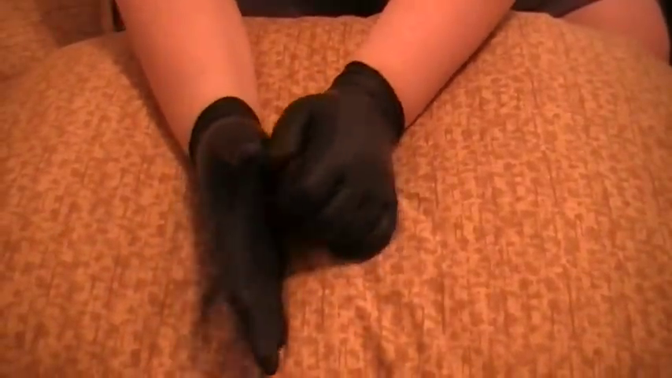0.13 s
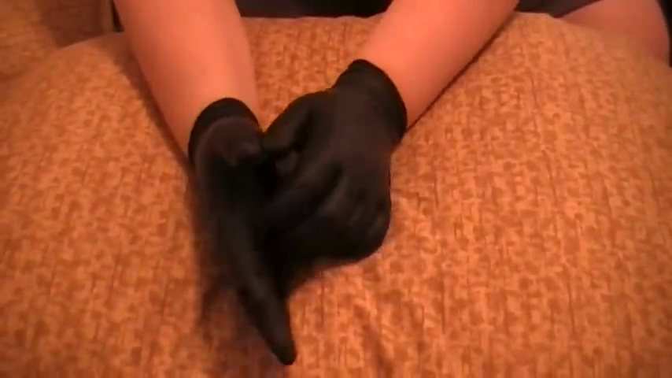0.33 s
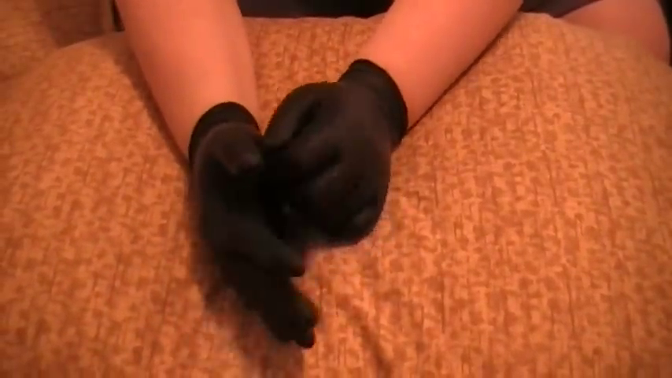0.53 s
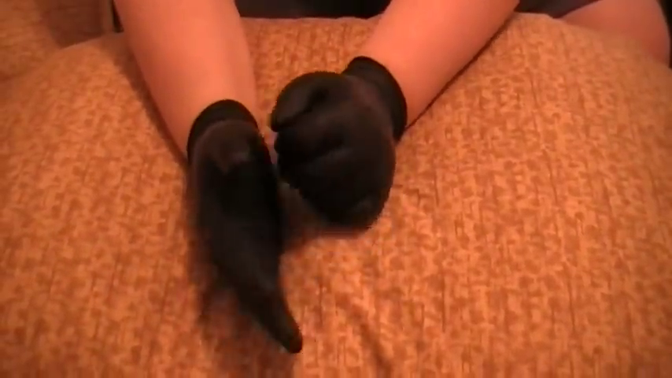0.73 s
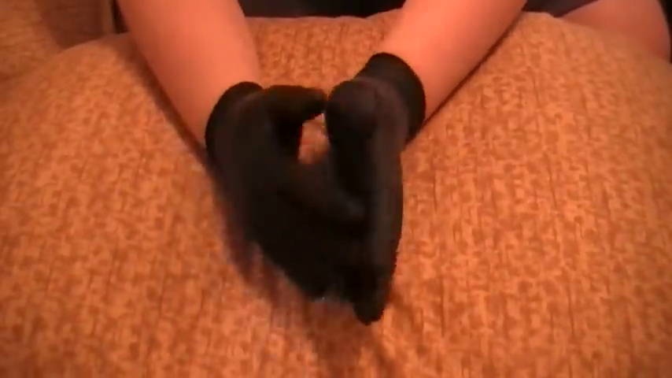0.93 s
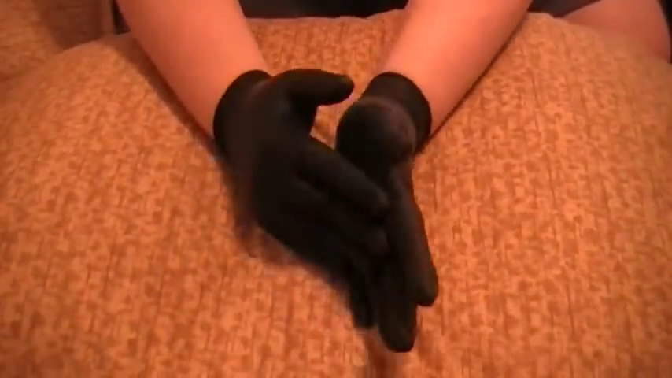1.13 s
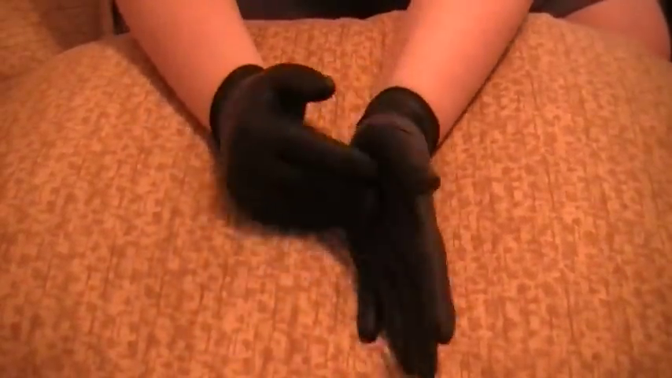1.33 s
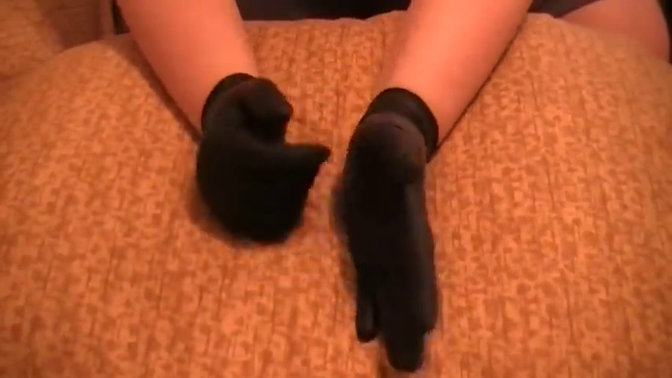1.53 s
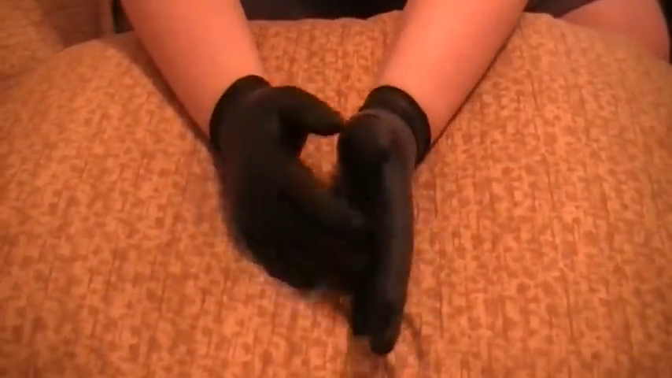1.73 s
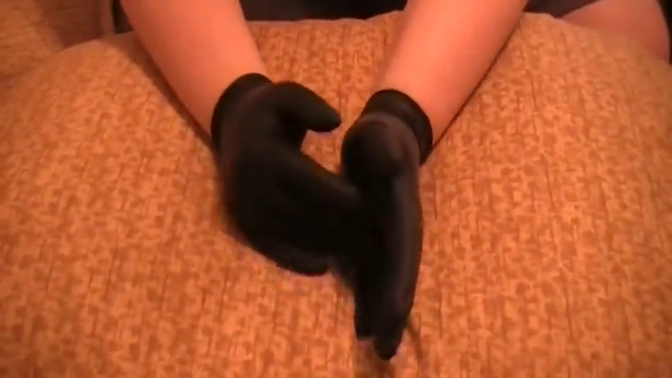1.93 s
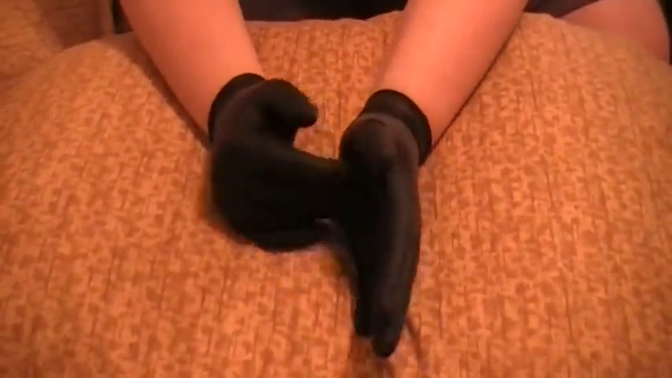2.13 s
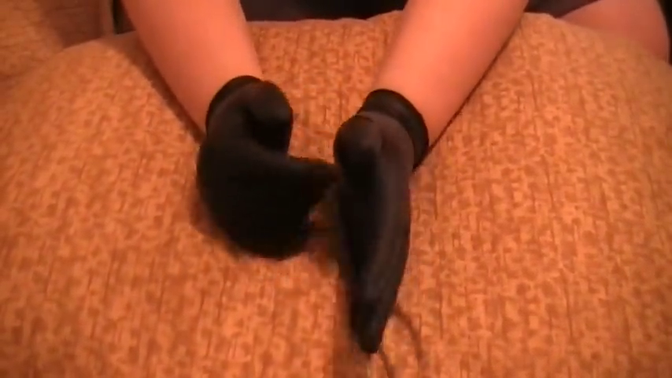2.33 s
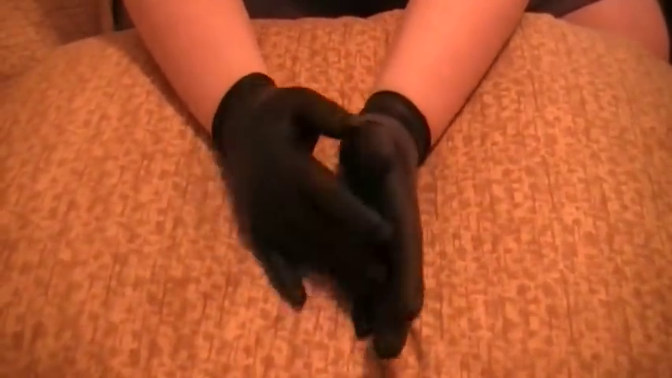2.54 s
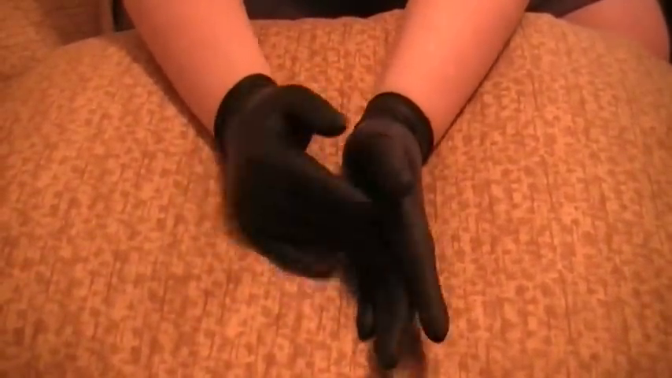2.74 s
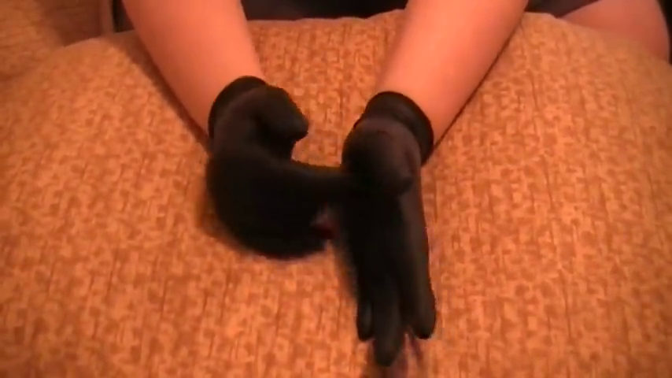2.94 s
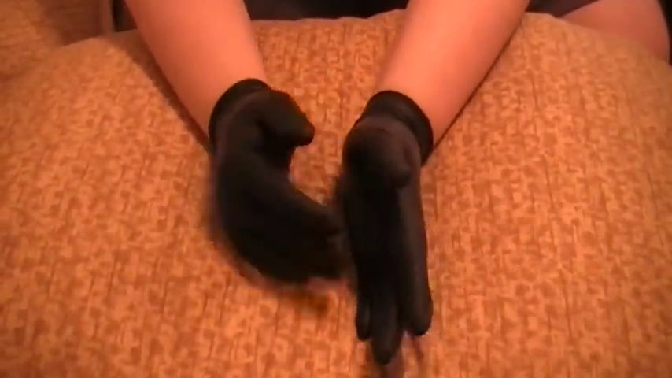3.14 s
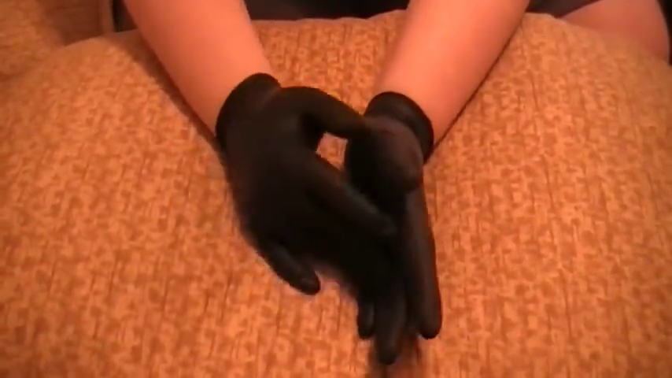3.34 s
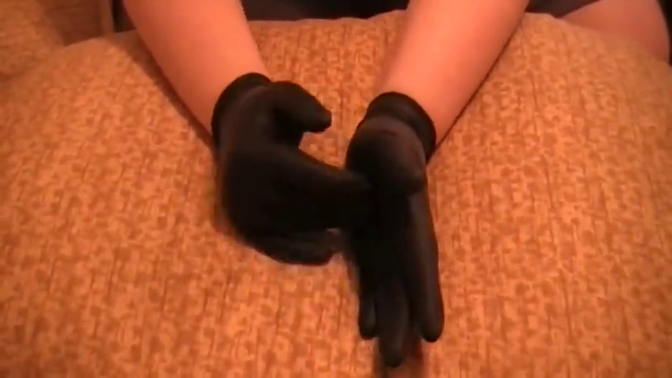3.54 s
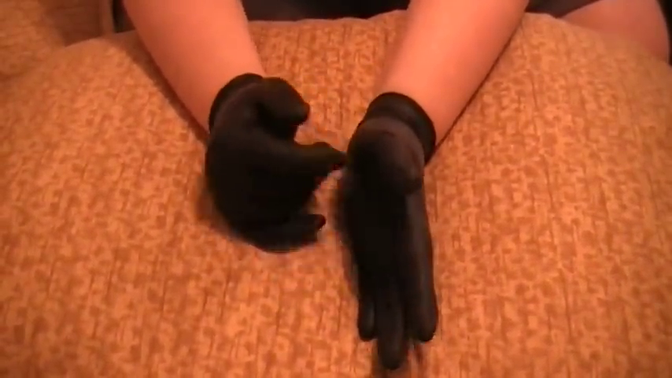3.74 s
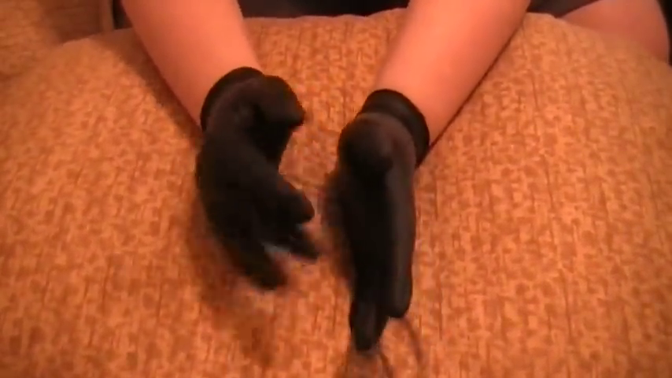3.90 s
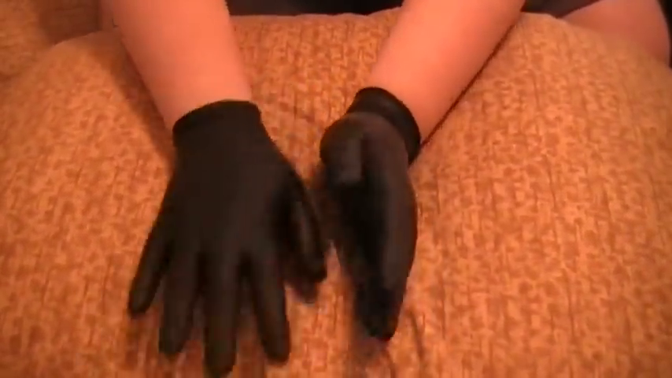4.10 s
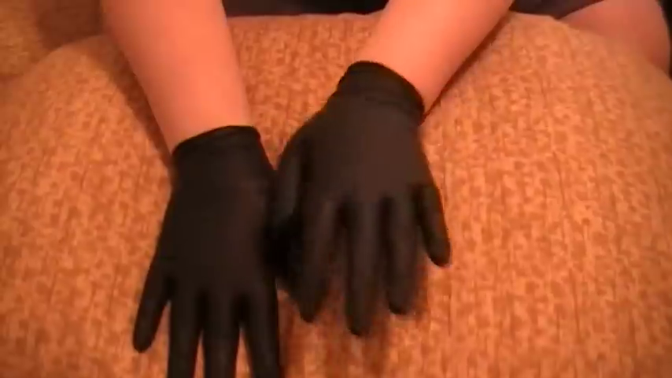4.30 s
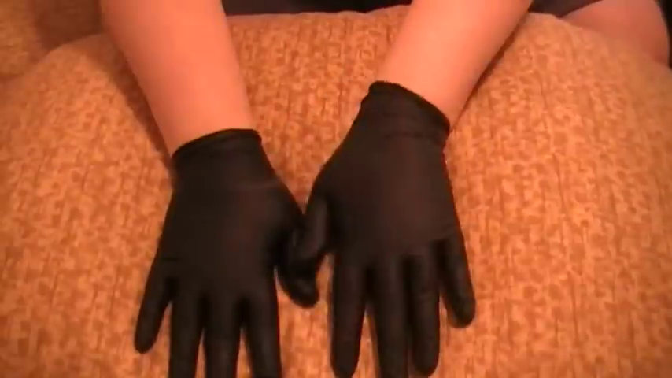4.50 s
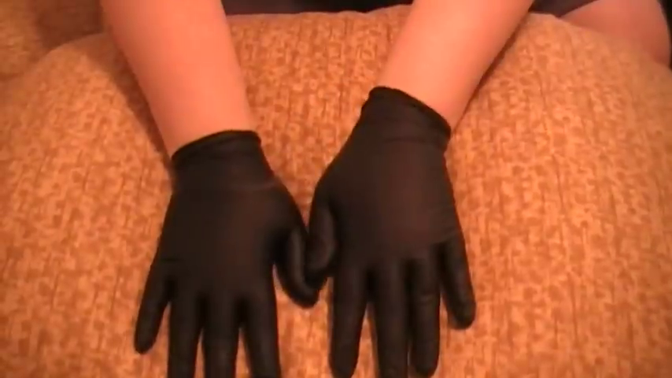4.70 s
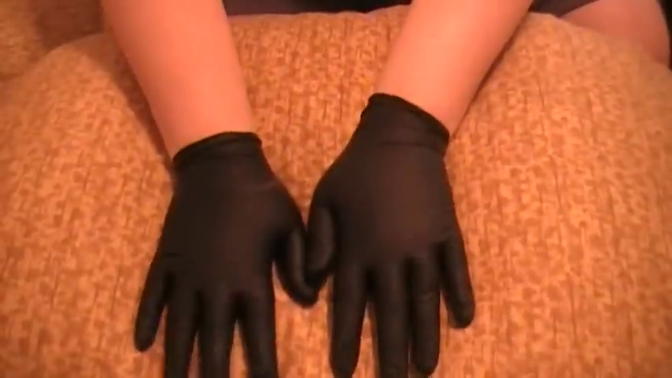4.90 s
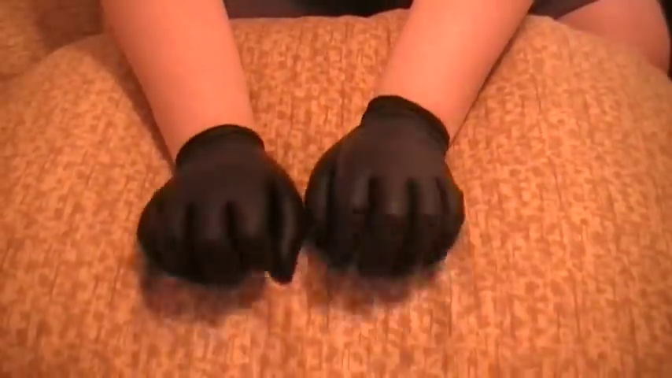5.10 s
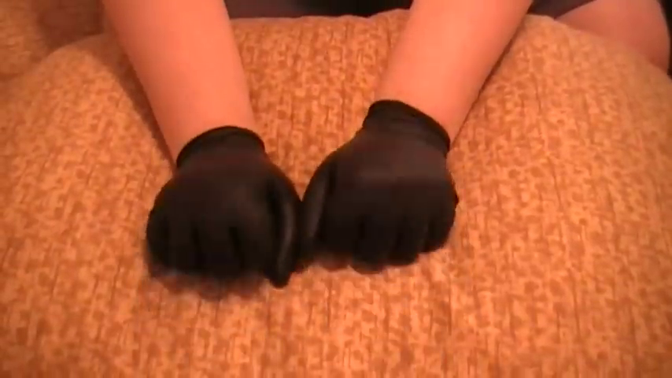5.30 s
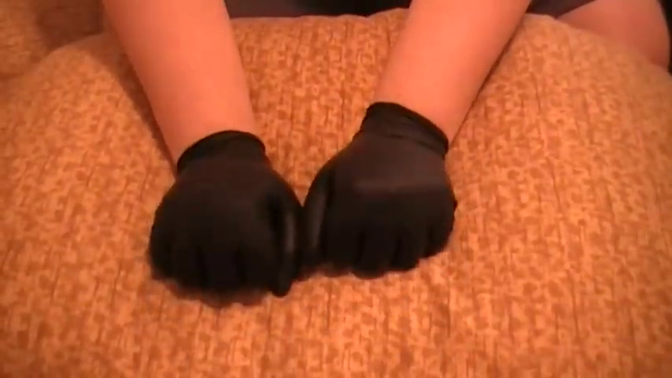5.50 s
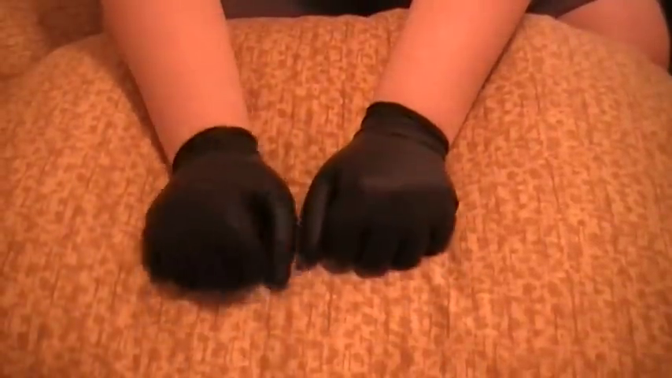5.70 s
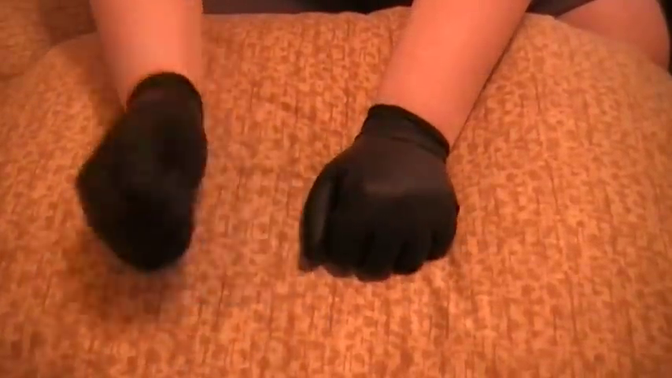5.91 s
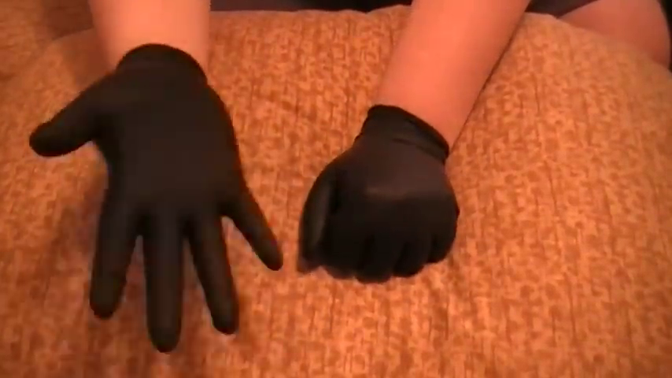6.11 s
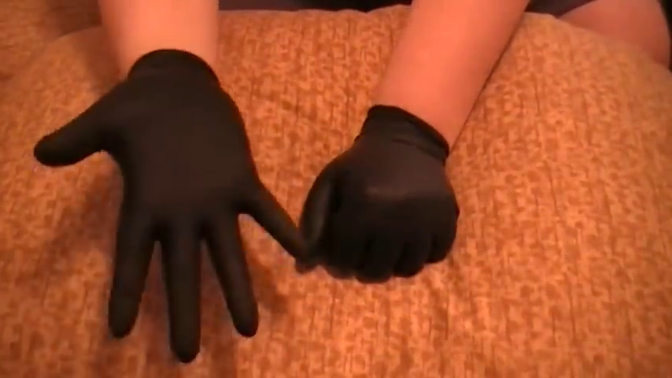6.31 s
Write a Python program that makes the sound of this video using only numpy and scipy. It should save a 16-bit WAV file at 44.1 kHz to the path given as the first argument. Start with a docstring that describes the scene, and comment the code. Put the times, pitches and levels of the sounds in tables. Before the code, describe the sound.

Gloved hands at a close stereo microphone: the film tightens with a brief rising hiss and creak, then snaps brightly against skin with a short room echo. Snaps come singly and in rapid flurries, between scrapes and rubs. Later only smooth cloth rubbing, quiet ticks and soft hand landings remain, over faint air noise and thin hum.

```python
"""Two hands in latex gloves work over a cloth cushion in a small room, heard from very close.
Still air, a wavering fan hum and a faint picture tube whistle (noise and sines) lie under everything.
For nearly four seconds stretched rubber hisses, creaks and snaps (click bursts through filters), hot enough
to clip; between the snaps come cloth rubs, crease clicks, scrapes (gliding resonances) and a soft pat.
Then longer rubs over the cloth lead (sparse grains), with juddering palms, a few ticks and more pats."""
import sys
import numpy as np
from scipy import signal
from scipy.fft import rfft, irfft
from scipy.io import wavfile
from scipy.ndimage import uniform_filter1d, minimum_filter1d

SR = 44100
rng = np.random.default_rng(int(sys.argv[2]) if len(sys.argv) > 2 else 0)


def store_wav(level_fs):
    """Save 16-bit WAV to argv[1]."""
    pcm = np.round(np.clip(np.atleast_2d(level_fs), -1, 1) * 32767)
    wavfile.write(sys.argv[1], SR, pcm.T.astype(np.int16))


N = 280022

# Still air: spectrum (frequency [Hz], level per Hz [dB]), then its overall rms level [dB]
AIR = [(20, -22), (45, -12), (68, -3), (105, -11), (160, -3), (270, -4), (420, -0.5), (800, -2),
       (1200, -3.5), (2100, -10), (4500, -19.5), (7500, -20), (10000, -29), (15000, -40)]
AIR_DB = -58.5
# Left-right likeness of the air: (frequency [Hz], likeness [0-1])
AIR_SAME = [(50, .5), (150, .1), (600, .05), (2000, 0.14), (7000, .3), (15000, .3)]
# Fan hum and picture tube whistle: (frequency [Hz], peak level [dB])
TONES = [(358, -71.5), (581, -75), (1085, -75), (15735, -69)]

# Snaps of the glove film: (time [s], slap on the skin [dB], air pocket [dB], crack of the film [dB],
# length of the peel [ms], slap pitch [Hz], pocket pitch [Hz], crack pitch [Hz],
# ring of the film re crack, before a common trim [dB], room echo [dB])
SNAPS = [(-0.025, -22, -22, -17.5, 1.13, 1210, 3000, 6940, -21, -8.5),
         (0.4257, -28, -27, -16, 0.67, 1260, 2490, 7730, -33.5, -8.5),
         (0.5272, -19.5, -15.5, -6, 1.1, 1310, 2620, 7030, -15, -8.7),
         (0.5961, -27, -23, -13.5, 1.2, 1940, 2970, 7400, -13, -8.5),
         (0.5986, -31, -23.5, -17.5, 0.85, 1590, 2020, 7400, -33, -9),
         (0.6507, -35.5, -36, -20, 0.52, 1450, 2700, 8300, -28, -8),
         (1.2943, -23, -27, -21.5, 0.65, 1220, 2480, 7850, -33, -9),
         (1.4397, -25, -18.5, -15.5, 1, 1280, 2730, 7800, -16.5, -8.5),
         (1.4554, -29, -24, -16, 0.72, 1380, 2700, 7280, -20, -9),
         (2.0177, -23, -25, -13.5, 0.83, 1490, 2590, 7500, -32.5, -9.5),
         (2.172, -27, -20.5, -23.5, 2.2, 1190, 2940, 7200, -15, -8),
         (2.1853, -20.5, -14.5, -7.5, 1.33, 1070, 3040, 7410, -11.5, -9.5),
         (2.2025, -34, -28, -22.5, 1.4, 1460, 3100, 7150, -17, -11),
         (2.215, -42, -31, -31, 0.73, 1190, 3100, 6450, -23, -11),
         (2.7664, -39, -33.5, -31, 1, 1580, 2600, 7140, -33, -11),
         (2.786, -35.5, -40, -28, 1.7, 1390, 2650, 7190, -33, -9),
         (2.8023, -25, -18, -13.5, 2, 1650, 2670, 7320, -31, -10),
         (2.8126, -30.5, -26.5, -23, 1, 1540, 2650, 7540, -28, -10.5),
         (2.9353, -28, -19.5, -21.5, 1, 1530, 3040, 7200, -12, -8),
         (2.9497, -29, -21.5, -11, 0.65, 1270, 3080, 7500, -13, -9.5),
         (2.9519, -34, -25, -19, 0.74, 1210, 3060, 7370, -23, -11),
         (2.9713, -40, -35, -29.5, 0.8, 1200, 3100, 7800, -28, -8),
         (3.501, -27.5, -23, -10.5, 0.7, 1138, 2673, 7600, -33, -10),
         (3.5053, -34.5, -42, -22, 0.74, 870, 2700, 7360, -33, -9),
         (3.6363, -39, -34, -32, 1, 1430, 2700, 5590, -33, -9.5),
         (3.6425, -16, -17, -5.5, 1.4, 1450, 2820, 7090, -21.5, -11),
         (3.6661, -32.5, -25, -17, 0.85, 1320, 2920, 7200, -25.5, -11),
         (3.6885, -33.5, -26, -12, 0.87, 1260, 2900, 7610, -28, -11.5)]
# Spectra of slap, crack and rubber hiss: (frequency [Hz], level [dB])
SLAP = [(30, -50), (120, -26), (300, -12), (520, -8), (760, -0.5), (1000, -3.5), (1350, 0), (1850, -2.5),
        (2400, -11), (4500, -30), (16000, -70)]
CRACK = [(100, -60), (1800, -24), (3000, -17), (4000, -13.5), (5100, -9), (6000, -10.5), (7300, 0),
         (8200, -4), (9200, -14.5), (11000, -22.5), (16000, -32)]
HISS = [(100, -45), (1500, -22), (3000, -12.5), (4500, -9), (5700, -3.5), (7200, 1), (8200, -3),
        (9500, -13), (12000, -21), (16000, -38)]
# Ring of the freed film: (frequency [Hz], width of each resonance pass [Hz], level [dB], t60 [s])
FILM_MODES = [(3170, 170, 0, .45), (3430, 350, -10, .36), (4800, 350, -8, .3)]
# Pitches at which the low and the high spectra are written, before each event shifts them [Hz]
LOW_HZ, HIGH_HZ = 1300, 7300

# Fingers pull the film tighter until it lets go: (time of letting go [s], time to build by 10 dB [s],
# rub before trim [dB], hiss of the rubber before trim [dB], creak of the air pocket [dB])
PULLS = [(0.424, .018, -53, -41, -66), (1.292, .048, -44, -40, -49), (1.438, .022, -58, -41, -64),
         (2.012, .07, -44.5, -42.5, -44), (2.17, .018, -47, -42, -42), (2.795, .07, -43, -38, -43),
         (3.497, .085, -47.5, -42, -51), (3.636, .026, -51, -48, -66)]
LET_GO_S = .024  # the tension falls 10 dB in this time
CREAK_HZ = 2630  # air pocket under the stretched film
CREAK_POWER = 1.35  # the creak grows faster than the tension
# Hand slides: (time of full speed [s], rise by 10 dB [s], fall by 10 dB [s],
# rub on the cloth before trim [dB], hiss of the rubber before trim [dB])
RUBS = [(0.02, .05, .18, -58, -57), (0.13, .06, .04, -62, -59), (0.21, .035, .07, -52, -50.5),
        (0.37, .04, .12, -63, -55.5), (0.79, .1, .14, -76, -59.5), (0.96, .075, .11, -55.5, -54.5),
        (1.15, .065, .1, -54, -52.5), (1.66, .14, .16, -57.5, -57.5), (1.865, .055, .07, -60, -52.5),
        (2.42, .13, .11, -59, -58), (2.6, .1, .12, -57.5, -55), (3.2, .13, .12, -58.5, -60),
        (3.35, .05, .07, -63, -56), (3.98, .14, .17, -57.5, -56.5), (4.2, .13, .105, -48.5, -48),
        (4.44, .14, .17, -54, -56), (4.72, .15, .18, -60, -62.5), (5.02, .135, .13, -51, -50.5),
        (5.24, .13, .135, -51.5, -52), (5.79, .24, .25, -54.5, -54.5), (6.02, .05, .13, -58.5, -55.5),
        (6.25, .18, .2, -63, -76)]
RUB_ROUNDNESS = 1.4  # 1 swells to a sharp peak, 2 like a bell
# Spectrum of the cloth rub: (frequency [Hz], level [dB])
CLOTH = [(30, -42), (100, -22), (200, -6), (450, 0), (900, -1.5), (1600, -2), (2800, -6), (4200, -13.5),
         (8000, -30), (16000, -55)]

# Small creases that flip: (time [s], body [dB], crack [dB], body pitch [Hz], crack pitch [Hz])
TICKS = [(0.1467, -59, -56, 2100, 6370), (0.3423, -56.5, -45, 3160, 6100), (0.9113, -49, -48.5, 1160, 7800),
         (1.1597, -45, -35, 2430, 7700), (1.205, -68, -39.5, 1540, 7160), (1.238, -56, -39.5, 1780, 7700),
         (1.3555, -42.5, -45.5, 1670, 7180), (1.654, -49, -45, 4390, 6300), (1.767, -66, -50.5, 1640, 7300),
         (1.8297, -59, -46, 1300, 7330), (1.9373, -45.5, -36.5, 2660, 6850),
         (1.9595, -46, -39.5, 2640, 6900), (1.9919, -43, -30.5, 2410, 7500), (2.61, -53, -40.5, 3710, 7350),
         (2.614, -54, -42.5, 2420, 7300), (2.6478, -54, -37.5, 2730, 7600),
         (2.6766, -49.5, -31, 3710, 7590), (3.16, -47.5, -48.5, 2430, 6990),
         (3.3637, -49, -34.5, 3430, 7600), (3.369, -54, -39, 3420, 7400), (3.4064, -54, -44, 3670, 6830),
         (3.8823, -59, -53, 2010, 5930), (4.2817, -59.5, -42, 1390, 7260), (4.2903, -65, -49, 1480, 7110),
         (4.6876, -50, -57.5, 2490, 7980), (5.7744, -47, -49, 1600, 7510), (5.8484, -52, -50, 1940, 6950),
         (5.9548, -48, -58, 3070, 5540), (6.1068, -69, -54.5, 1500, 6430), (6.272, -68, -59, 1900, 7000)]
# Spectra of a crease's crack and body: (frequency [Hz], level [dB])
CREASE = [(100, -50), (2000, -30), (4000, -17), (5800, -8), (7300, 2.5), (8700, -5), (11000, -14),
          (16000, -25)]
CREASE_BODY = [(50, -34.5), (250, -17), (750, -11), (1300, 0.5), (1900, -10), (3000, -22), (9000, -45)]
# A dull crease flips more slowly than a crisp one: (body minus crack [dB], length of the flip [ms])
FLIP = [(-5, .34), (8, 2.2)]

# Short scrapes of rubber that sticks and slips:
# (start [s], length [s], level [dB], resonance at the start [Hz], resonance at the end [Hz])
SCRAPES = [(.176, .064, -42.5, 6300, 5500), (.228, .054, -46, 6800, 6600), (.279, .011, -38.5, 6200, 6200),
           (1.295, .075, -54, 2600, 2600), (1.937, .085, -42, 7300, 6300), (3.43, .07, -46, 6400, 7300),
           (4.74, .18, -68, 4700, 4600), (4.94, .35, -60.5, 2300, 2750), (5.238, .045, -52.5, 6700, 6300)]
# Palms judder as they drag over the cushion:
# (start [s], length [s], level [dB], pitch at the start [Hz], pitch at the end [Hz])
JUDDERS = [(4.41, .27, -71, 165, 157), (4.64, .08, -63, 245, 258), (4.77, .19, -67.5, 156, 144),
           (4.94, .07, -67.5, 260, 243), (5.03, .1, -69, 147, 152)]
STROKE_EDGE = .15  # share of a scrape or judder spent on its attack, and again on its release

# Soft landings of a hand: (time [s], level [dB], length [s]); the swell peaks after a third of the length
PATS = [(0.197, -53, 0.033), (4.14, -52, .12), (4.401, -45.5, 0.026), (5.84, -55.5, .05)]
# Spectrum of a pat: (frequency [Hz], level [dB])
PAT = [(30, -26), (100, -14), (220, -1), (450, 0), (800, -4), (1500, -12.5), (4000, -35), (16000, -61)]

# Room decay: (frequency [Hz], t60 [s])
ROOM_T60 = [(200, 0.02), (600, 0.26), (1400, 0.3071), (3200, 0.35), (7000, 0.2945), (12000, 0.1859)]
# Room echo spectrum: (frequency [Hz], level [dB])
ROOM_COLOUR = [(60, -8), (300, 4), (1200, 2.5), (3000, 1), (5000, 2.5), (7500, -3.5), (11000, -6),
               (16000, -12)]
# Left-right likeness of the echo: (frequency [Hz], likeness [0-1])
ROOM_SAME = [(100, .3), (400, 0.7), (1000, 0.88), (4000, 0.89), (7500, .85), (9000, .5), (15000, .6)]
# Phase between the two microphone ports: (frequency [Hz], lead of the left [rad])
PORT_PHASE = [(0, 0.5), (6000, -0.01), (8200, -0.14), (8800, 0.86), (9500, 0.6), (10500, 0.05),
              (16000, -0.2)]
# Balance of the two ports: (frequency [Hz], left minus right [dB])
PORT_BALANCE = [(60, -2), (500, 0), (3000, -.6), (7000, -0.4), (8000, -2), (8600, -4), (9400, 1),
                (11000, -1), (16000, 0.5)]
EDGE_HZ = 16000  # upper band limit


def amp(db):
    """Decibels to gain."""
    return 10 ** (np.asarray(db) / 20)


def evened(x):
    """Scales to rms 1."""
    return x / np.sqrt(np.mean(x ** 2) + 1e-20)


def at_level(x, db):
    """Scales a click so that its energy, spread over 5 ms, has the given rms level."""
    return amp(db) * x / np.linalg.norm(x) * np.sqrt(.005 * SR)


def read(points, hz):
    """Reads a curve on a log-frequency axis."""
    f, value = np.transpose(points)
    return np.interp(np.log(hz + 1), np.log(f + 1), value)


def add(mix, s, sound):
    """Drops a sound into the mix at a time, cut to the mix's length."""
    start = round(s * SR)
    sound = sound[..., max(-start, 0):]
    part = mix[..., max(start, 0):][..., :sound.shape[-1]]
    part += sound[..., :part.shape[-1]]


def colour(x, points, shift=1, size=4096):
    """Minimum-phase filter with the given spectrum, moved in pitch by a factor."""
    hz = abs(np.fft.fftfreq(size, 1 / SR))
    log_gain = np.log(amp(read(points, hz / shift)))
    response = np.exp(np.conj(signal.hilbert(log_gain)))
    taps = np.fft.ifft(response).real[:size // 2]
    return signal.fftconvolve(x, taps)[:len(x)]


def resonate(x, hz, width):
    """A resonance of gain 1 whose pitch may move: shift down to 0 Hz, smooth, shift back."""
    turn = np.exp(2j * np.pi * np.cumsum(hz * np.ones(len(x))) / SR)
    r = np.exp(-np.pi * width / SR)
    smooth = signal.lfilter([1 - r], [1, -r], x / turn + 1e-18)
    return 2 * (turn * smooth).real


def drift(per_s):
    """Slow random wander of rms 1, with this many knots a second."""
    knots = rng.standard_normal(4000)
    return evened(np.interp(np.arange(N) / SR * per_s, np.arange(len(knots)), knots))


def grains(per_s, spread_db):
    """Sparse clicks of uneven size and random sign."""
    size = amp(spread_db * np.minimum(rng.exponential(1, N), 4)) * rng.choice([-1., 1.], N)
    return size * (rng.random(N) < per_s / SR)


def room(gap_s=0.0019, early_db=5, early_s=0.011, grain=.5, patchy_db=2.2):
    """Stereo echo from one place of the hands: grainy near reflections, then a smooth tail."""
    t = np.arange(SR // 2) / SR
    grain_depth = grain * np.exp(-t / .06)
    lumps = np.exp(grain_depth * np.repeat(rng.standard_normal(len(t)), 32)[:len(t)])
    lumps /= np.exp(grain_depth ** 2)  # keeps the mean energy
    hz, frame_s, (shared, left, right) = signal.stft(rng.standard_normal((3, len(t))), SR, nperseg=256)
    same = np.clip(read(ROOM_SAME, hz), 0, 1)[:, None]
    z = np.sqrt(same) * shared + np.sqrt(1 - same) * np.array([left, right])
    z *= amp(read(ROOM_COLOUR, hz)[:, None] - 60 * frame_s / read(ROOM_T60, hz)[:, None])
    patches = evened(uniform_filter1d(rng.standard_normal(len(hz)), size=2))
    z *= evened(amp(patchy_db * patches))[:, None]  # each place favours its own bands
    tail = signal.istft(z, SR, nperseg=256)[1][:, :len(t)]
    shape = (1 - np.exp(-(t / gap_s) ** 2)) * amp(early_db * np.exp(-t / early_s))
    return tail * shape * lumps / np.linalg.norm(amp(-60 * t / read(ROOM_T60, 3000)))


def in_room(x, room_db):
    """The direct sound and its echo."""
    echo = amp(room_db) * room(patchy_db=1.1)
    echo[:, 0] += 1
    return signal.fftconvolve(x[None], echo, axes=1)


def background():
    """Still air as shaped noise; fan hum and picture tube whistle as sines with wandering phase."""
    hz, t = np.fft.rfftfreq(N, 1 / SR), np.arange(N) / SR
    left, other = rfft(rng.standard_normal((2, N)))
    same = np.clip(read(AIR_SAME, hz), -1, 1)
    right = same * left + np.sqrt(1 - same ** 2) * other
    air = irfft(np.array([left, right]) * amp(read(AIR, hz)), N)
    tones = sum(amp(db) * np.sin(2 * np.pi * f * t + .6 * drift(9)) for f, db in TONES)
    return amp(AIR_DB) * evened(air) + tones


def burst(length_ms, after_db=-17, after_ms=2.2, size=1024):
    """Rubber peels off in a flurry of tiny slips, and the hands throw a little of it back."""
    ms = 1000 * np.arange(size) / SR
    shape = np.exp(-(ms / length_ms) ** 2) + amp(after_db) * np.exp(-ms / after_ms)
    return shape * rng.choice([-1., 1.], size)


def snap_sound(slips, blow, slap_db, pocket_db, crack_db, slap_hz, pocket_hz, crack_hz,
               pocket_width_hz=380, slap_width_hz=700):
    """Slips crack the film; its blow slaps the skin and rings a pocket of trapped air."""
    crack = colour(slips, CRACK, crack_hz / HIGH_HZ)
    slap = colour(blow, SLAP, np.sqrt(slap_hz / LOW_HZ))  # the broad spectrum moves half as far as the pitch
    slap = slap + .7 * resonate(slap, slap_hz, slap_width_hz)
    pocket = resonate(np.diff(blow, prepend=0), pocket_hz, pocket_width_hz)
    pocket = resonate(resonate(pocket, pocket_hz, 3500), pocket_hz, 3500)
    return at_level(crack, crack_db) + at_level(slap, slap_db) + at_level(pocket, pocket_db)


def film_ring():
    """The freed film flutters on in a few fuzzy modes: narrow noise bands that die away."""
    t, ring = np.arange(SR // 2) / SR, 0
    for hz, width, db, t60 in FILM_MODES:
        flutter = resonate(resonate(rng.standard_normal(len(t)), hz, width), hz, width)
        ring = ring + evened(flutter) * amp(db - 60 * t / t60)
    return ring


def snaps(blow_share=.4, lead_db=-23, lead_s=.0014, ring_trim_db=-9, pocket_echo_db=-2):
    """The film starts to slip, snaps and rings on; the room gathers it from all sides, so its echo is smooth."""
    out, t, click = np.zeros((2, N)), np.arange(512) / SR, signal.unit_impulse(1024)
    for (s, slap_db, pocket_db, crack_db, length_ms,
         slap_hz, pocket_hz, crack_hz, ring_db, room_db) in SNAPS:
        pitches = slap_hz, pocket_hz, crack_hz
        blow = burst(blow_share * length_ms, after_db=-18, after_ms=2.8)
        direct = snap_sound(burst(length_ms), blow, slap_db, pocket_db, crack_db, *pitches)
        add(out, s, direct)
        # the echo starts from a single click in place of the flurry
        spread = snap_sound(click, click, slap_db, pocket_db + pocket_echo_db, crack_db, *pitches)
        add(out, s, amp(room_db) * signal.fftconvolve(spread[None], room(), axes=1))
        lead = colour(rng.standard_normal(len(t)), HISS) * np.exp(-t / lead_s)[::-1]  # swells into the snap
        add(out, s - len(t) / SR, at_level(lead, crack_db + lead_db))
        add(out, s, at_level(film_ring(), crack_db + ring_db + ring_trim_db))
    return out


def swell(peak_s, rise_s, fall_s, roundness=1):
    """Gain over time that rises to 1 and falls again; the rise and the fall each span 10 dB."""
    t = np.arange(N) / SR - peak_s
    away = np.maximum(-t / rise_s, t / fall_s)
    return amp(-10 * np.minimum(away, 10) ** roundness)


def friction():
    """Strength over time of rub, hiss and creak: the powers of all pulls and slides add up."""
    rub, hiss, creak = np.zeros((3, N))
    for s, build_s, rub_db, hiss_db, creak_db in PULLS:
        tension = swell(s, build_s, LET_GO_S)
        rub += (amp(rub_db) * tension) ** 2
        hiss += (amp(hiss_db) * tension) ** 2
        creak += (amp(creak_db) * tension ** CREAK_POWER) ** 2
    for s, rise_s, fall_s, rub_db, hiss_db in RUBS:
        speed = swell(s, rise_s, fall_s, RUB_ROUNDNESS)
        rub += (amp(rub_db) * speed) ** 2
        hiss += (amp(hiss_db) * speed) ** 2
    return np.sqrt([rub, hiss, creak])


def stick_slip(hz, slips_per_s, width_share):
    """Rubber sticks and slips; slips and a bed of noise ring a resonance that follows the given pitch."""
    slips = (evened(grains(slips_per_s, 2.5)) + 0.63 * rng.standard_normal(N))[:len(hz)]
    for _ in range(4):
        slips = resonate(slips, hz, width_share * hz.mean())
    return evened(slips)


def moving_in_room(x, room_db, rounds_per_s=1.3, count=3):
    """The hands move, so their echo fades from one place in the room to the next, round and round."""
    turns = np.arange(N) / SR * rounds_per_s
    out = 0
    for k in range(count):
        share = np.cos(np.pi * (turns + k / count)) ** 2 * 2 / count
        out = out + in_room(x * share, room_db)
    return out


def sliding(cloth_room_db=0, hiss_room_db=-7, crackle_db=-6, uneven_db=1.5,
            cloth_trim_db=-2.8, hiss_trim_db=-.6):
    """Dense tiny slips on cloth and on rubber, with sparser crackles and a creak as the film stretches."""
    rub_gain, hiss_gain, creak_gain = friction() * amp(uneven_db * drift(70))
    cloth = evened(colour(grains(5000, 3), CLOTH)) * rub_gain * amp(cloth_trim_db)
    slips = evened(grains(12000, 2.5)) + amp(crackle_db) * evened(grains(300, 4.2))
    hiss = evened(colour(slips, HISS)) * hiss_gain * amp(hiss_trim_db)
    creak = stick_slip(np.full(N, CREAK_HZ), slips_per_s=700, width_share=.24) * creak_gain
    return (moving_in_room(cloth, cloth_room_db) + in_room(hiss + creak, hiss_room_db))[:, :N]


def ticks(room_db=-12):
    """Small creases flip with one click each: a low body and a bright crack, with little room."""
    out = np.zeros(N)
    for s, body_db, crack_db, body_hz, crack_hz in TICKS:
        flip_ms = np.interp(body_db - crack_db, *np.transpose(FLIP))
        body = colour(burst(flip_ms, after_db=-15.5, after_ms=2.7), CREASE_BODY, body_hz / LOW_HZ)
        crack = colour(burst(.3, after_db=-19.5, after_ms=1.5), CREASE, crack_hz / HIGH_HZ)
        add(out, s, at_level(body, body_db))
        add(out, s, at_level(crack, crack_db))
    return in_room(out, room_db)[:, :N]


def strokes(rows, slips_per_s, width_share, room_db):
    """Short runs of stick and slip that swell, hold and fade while their pitch glides."""
    out = np.zeros(N)
    for s, length_s, db, start_hz, end_hz in rows:
        u = np.linspace(0, 1, round(length_s * SR))
        envelope = np.minimum(np.minimum(u, 1 - u) / STROKE_EDGE, 1)
        hz = start_hz + (end_hz - start_hz) * u
        add(out, s, amp(db) * envelope * stick_slip(hz, slips_per_s, width_share))
    return in_room(out, room_db)[:, :N]


def scrapes():
    """Rubber scrapes: frequent slips through a broad gliding resonance."""
    return strokes(SCRAPES, slips_per_s=700, width_share=.4, room_db=-12.5)


def pats(room_db=-8):
    """A hand lands on the cushion with a dull puff: dark noise under a quick swell."""
    out, t = np.zeros(N), np.arange(SR // 2) / SR
    for s, db, length_s in PATS:
        u = t / (length_s / 3)
        puff = evened(colour(rng.standard_normal(len(t)), PAT))
        add(out, s, amp(db) * u * np.exp(1 - u) * puff)
    return in_room(out, room_db)[:, :N]


def judders():
    """Dragging palms judder: sparser slips through a low gliding resonance."""
    return strokes(JUDDERS, slips_per_s=150, width_share=.3, room_db=-14)


def scene():
    """The gloves over the quiet room."""
    return background() + snaps() + sliding() + ticks() + scrapes() + pats() + judders()


def limit(x, ceiling_db=4.5, recovery_db_per_s=1800):
    """A fast limiter: the gain drops at each peak and recovers within a few milliseconds."""
    over_db = np.maximum(20 * np.log10(abs(x).max(0) + 1e-9) - ceiling_db, 0)
    over_db = -minimum_filter1d(-over_db, size=25)  # widens each peak to both sides
    fall = np.arange(N) * recovery_db_per_s / SR
    reduction_db = np.maximum.accumulate(over_db + fall) - fall
    return x / amp(uniform_filter1d(reduction_db, size=21))


def record(dry, low_cut_hz=85):
    """Two close ports, a limiter that lets the loudest snaps clip, a low cut and the band limit."""
    hz = np.fft.rfftfreq(N, 1 / SR)
    # each port takes half of the difference in level and phase
    half = amp(read(PORT_BALANCE, hz) / 2) * np.exp(.5j * read(PORT_PHASE, hz))
    ports = irfft(rfft(dry) * np.array([half, 1 / half]), N)
    clipped = np.clip(limit(ports), -1, 1)
    thin = signal.lfilter(*signal.butter(1, low_cut_hz, "high", fs=SR), clipped)
    band = signal.firwin(255, EDGE_HZ, window=("kaiser", 7), fs=SR)
    return signal.oaconvolve(thin, band[None], "same")


dry = scene()
out = record(dry)
store_wav(out)
```